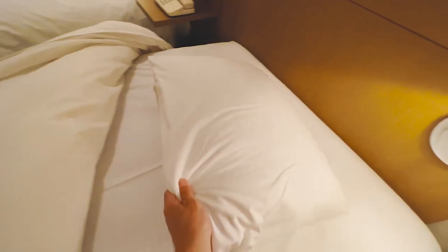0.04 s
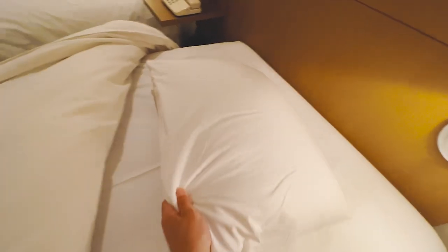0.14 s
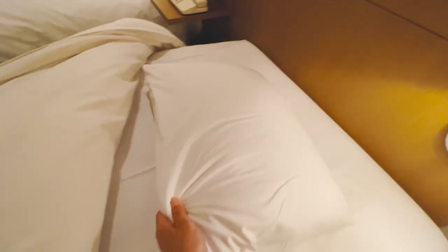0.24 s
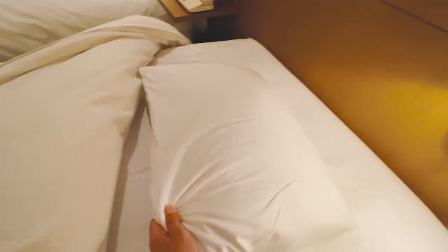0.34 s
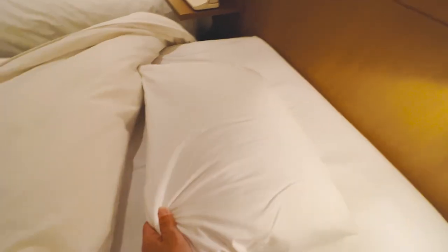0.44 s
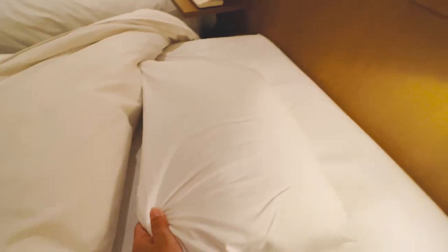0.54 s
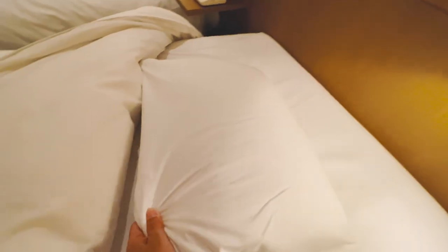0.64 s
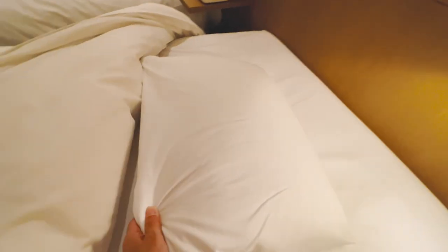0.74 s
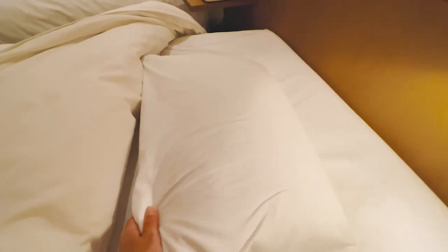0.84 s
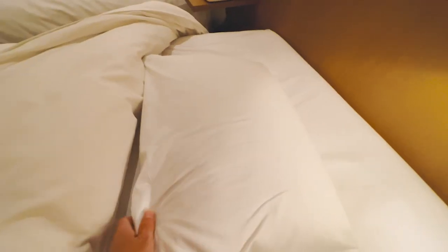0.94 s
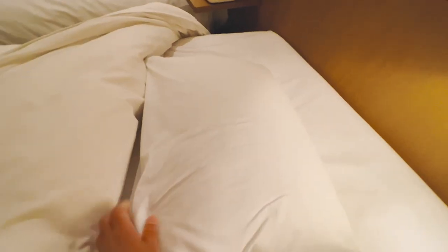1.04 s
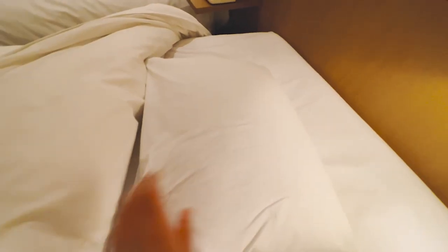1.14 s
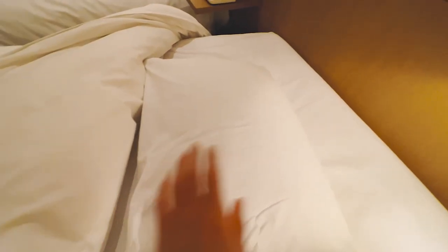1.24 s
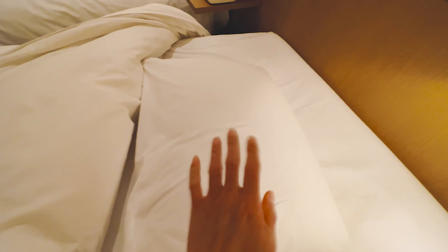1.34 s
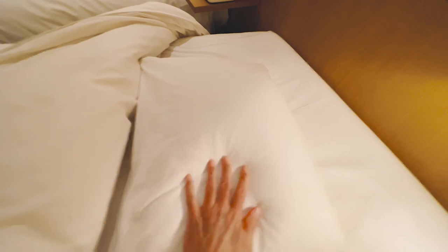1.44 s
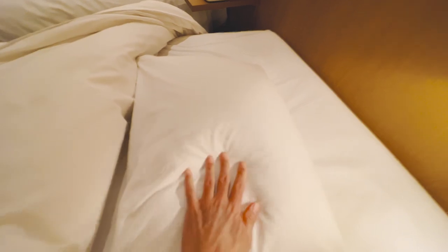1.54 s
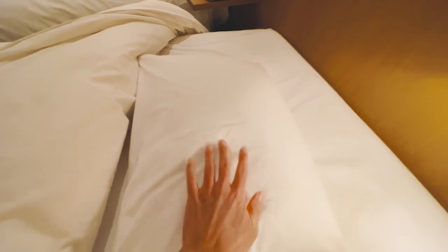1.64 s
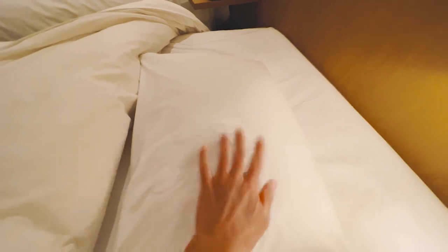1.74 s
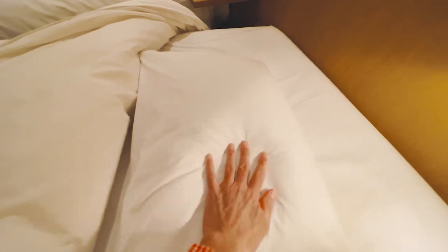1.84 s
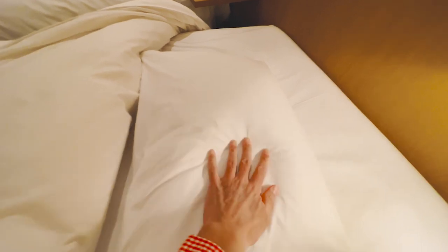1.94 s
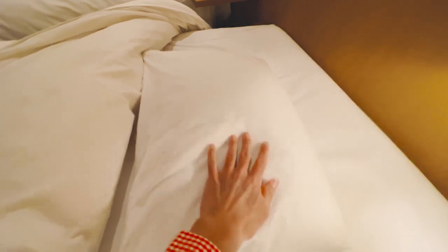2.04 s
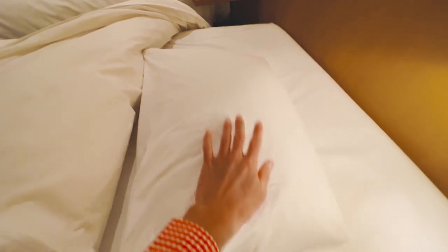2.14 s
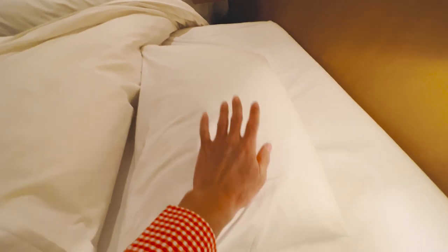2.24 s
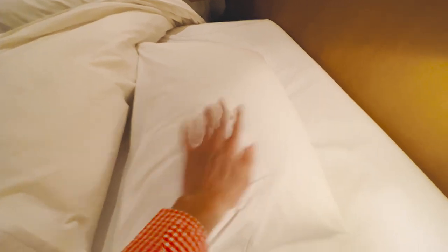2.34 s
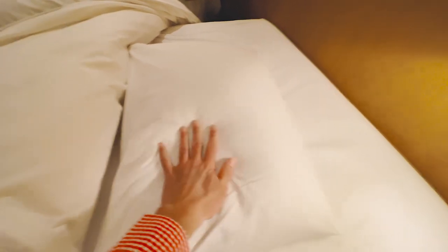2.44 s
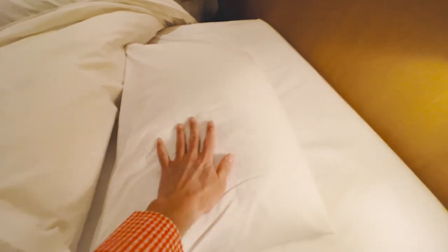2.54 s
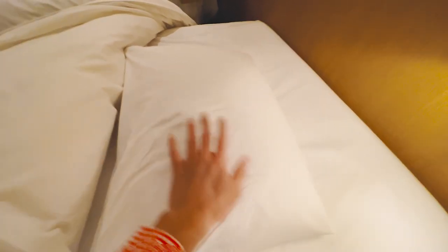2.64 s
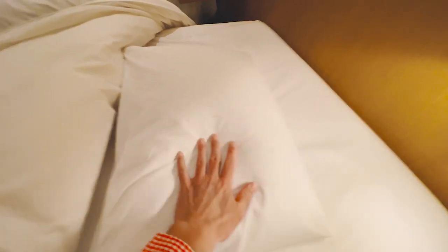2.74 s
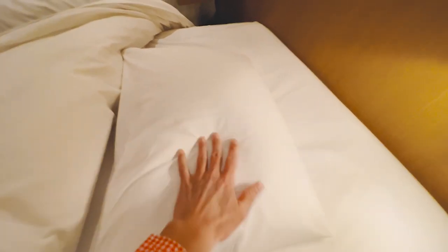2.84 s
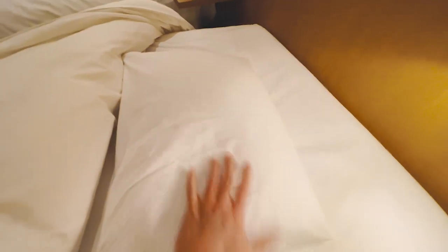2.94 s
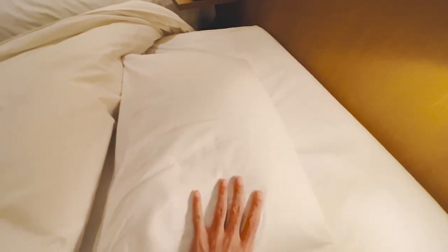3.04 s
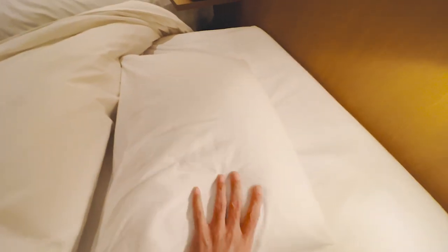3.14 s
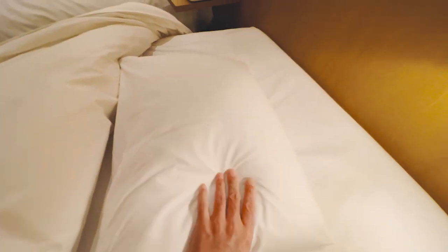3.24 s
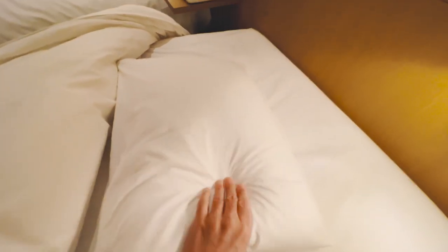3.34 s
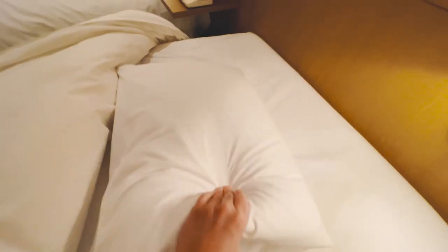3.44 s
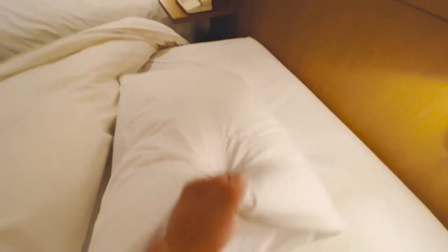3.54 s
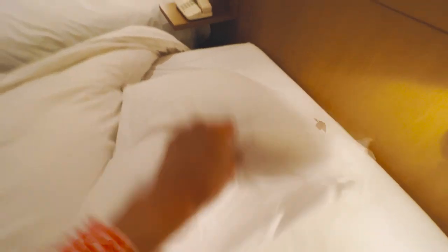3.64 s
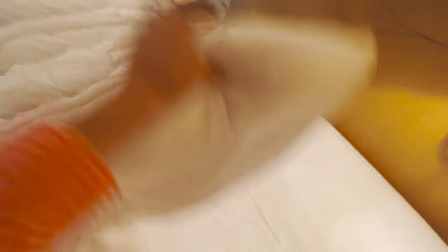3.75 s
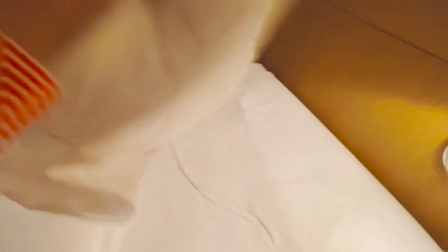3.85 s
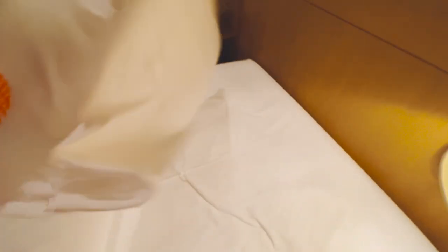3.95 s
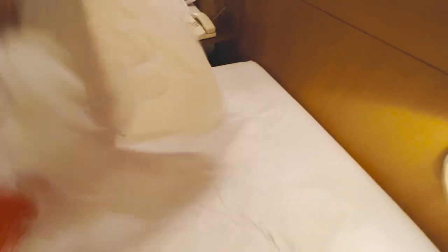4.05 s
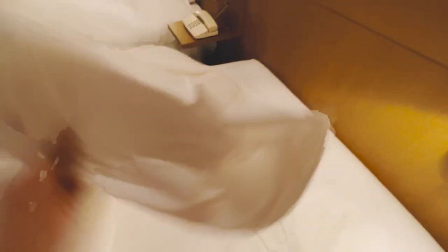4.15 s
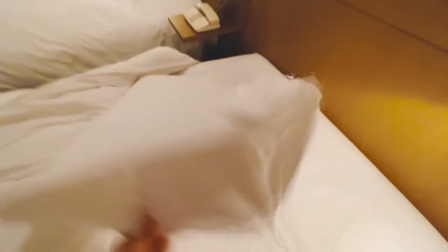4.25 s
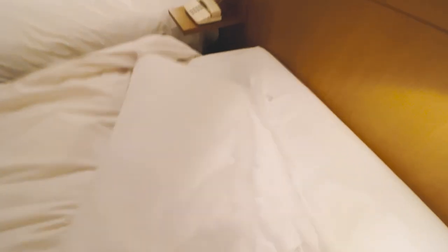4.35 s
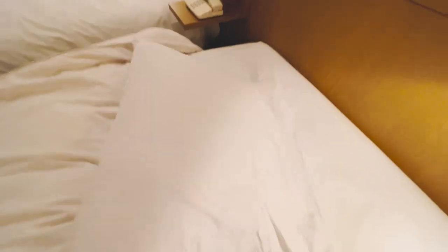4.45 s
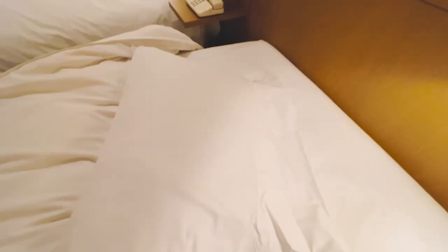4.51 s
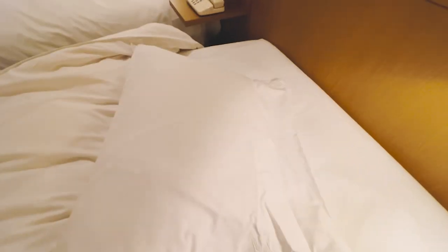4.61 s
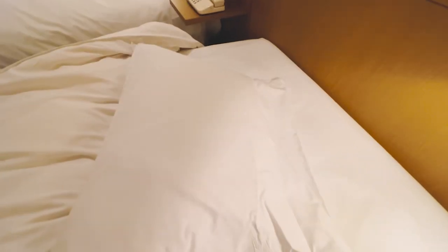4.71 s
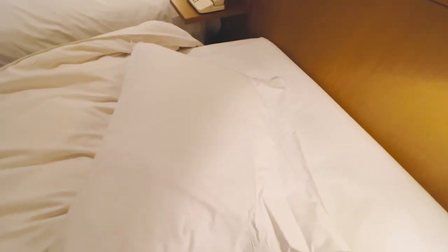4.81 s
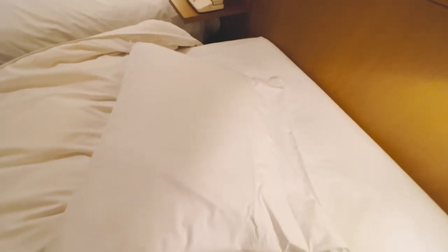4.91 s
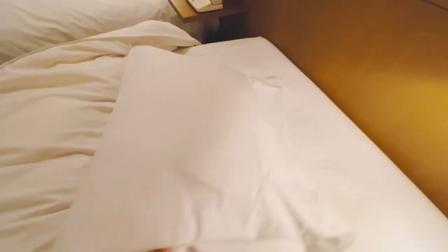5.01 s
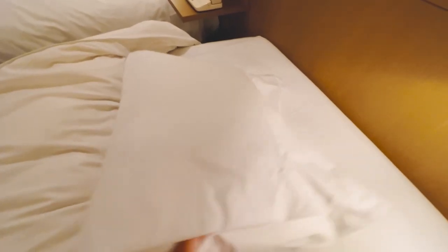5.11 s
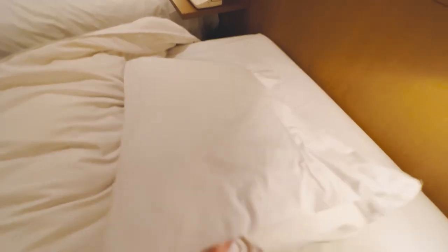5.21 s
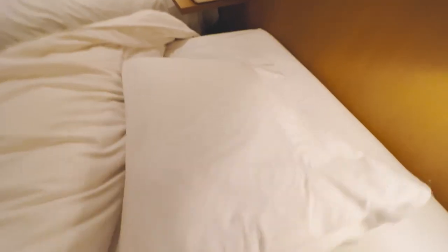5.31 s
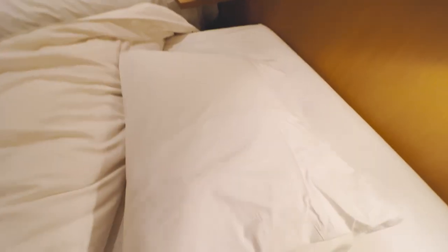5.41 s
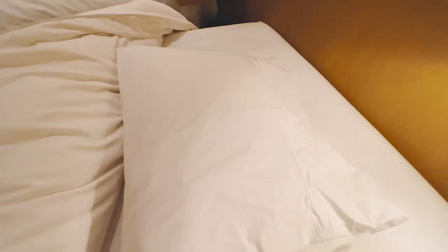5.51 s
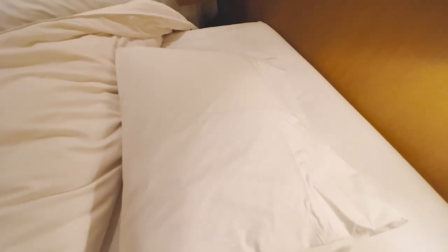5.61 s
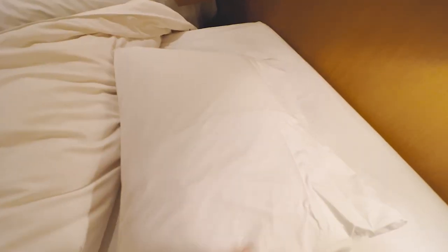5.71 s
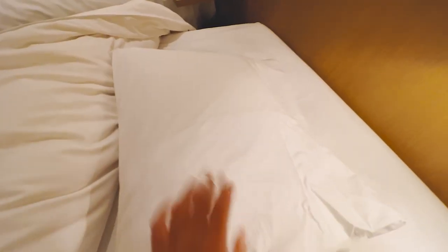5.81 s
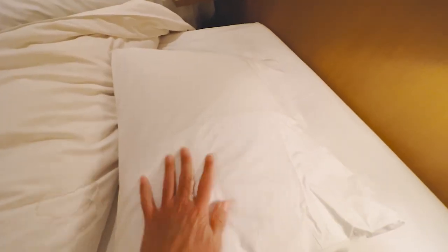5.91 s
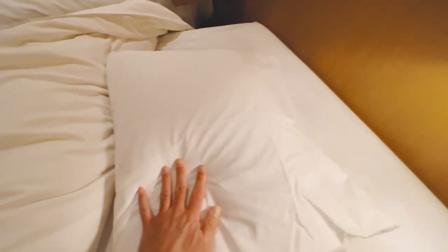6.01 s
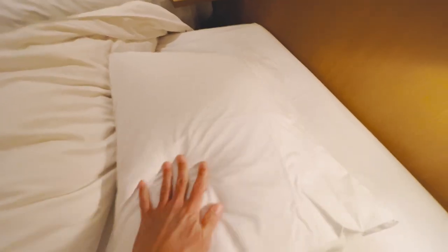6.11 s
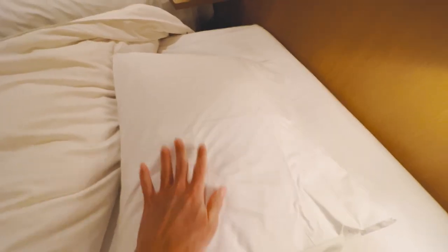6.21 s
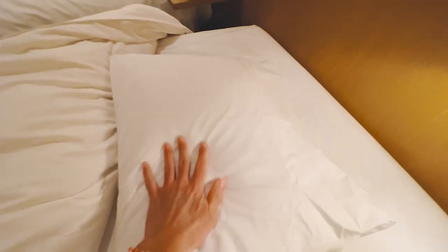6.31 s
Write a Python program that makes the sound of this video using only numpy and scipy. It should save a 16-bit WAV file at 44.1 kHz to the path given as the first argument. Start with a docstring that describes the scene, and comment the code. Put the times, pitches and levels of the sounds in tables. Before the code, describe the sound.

Cotton slides, a palm claps a plump pillow four times, fabric whooshes and rustles as it is turned, then two muffled pats follow.

```python
"""In a small, quiet room, a hand slides a pillow over a bed, pats it four times, flips it, drags it straight
and pats it twice more. Each pat claps out a pocket of air (a sagging tone) and pushes the filling (a falling
thump with booming room modes). Cotton rustles in between, as coloured noise that follows each movement, creases
snap and the pillowcase flaps with short ticks, the flapping pillow shoves the air, and low-pass noise makes a
ventilation rumble."""
import sys
import numpy as np
from scipy import signal
from scipy.fft import rfft, irfft, next_fast_len
from scipy.io import wavfile
from scipy.ndimage import map_coordinates

SR = 44100
rng = np.random.default_rng(int(sys.argv[2]) if len(sys.argv) > 2 else 0)


def store_wav(level_fs):
    """Save 16-bit WAV to argv[1]."""
    pcm = np.round(np.clip(np.atleast_2d(level_fs), -1, 1) * 32767)
    wavfile.write(sys.argv[1], SR, pcm.T.astype(np.int16))


N = 280917

# friction spectrum of a low rub, for cloth and fingers: frequency_hz, density_db (relative, per Hz)
RUB_SPECTRUM = [(250, -30.5), (500, -1), (700, 1), (1200, -5.5), (1700, -7.5), (2400, -17.5), (5000, -32)]
BASS_WET_DB = -9  # room share of low sounds: the bedding soaks up bass


def amp(db):
    """Level law: decibels to an amplitude ratio."""
    return 10 ** (np.asarray(db) / 20)


def unit(x):
    """Power normalization: scale to rms 1."""
    return x / np.sqrt(np.mean(x ** 2) + 1e-20)


def along(points, hz):
    """Logarithmic frequency scale: interpolate (frequency_hz, value) points along it."""
    f, v = np.transpose(points)
    return np.interp(np.log(hz + 1), np.log(f + 1), v)


def wobble(rate):
    """Slow random modulation: a smooth curve through rate random knots a second."""
    knots = rng.standard_normal(int(N * rate / SR) + 4)
    return map_coordinates(knots, [np.arange(N) * rate / SR])


def filtered(x, response):
    """Linear filtering: multiply the spectrum by a response of frequency."""
    n = x.shape[-1]
    m = next_fast_len(n + 8192)  # zero padding leaves room for the filter to ring
    return irfft(rfft(x, m) * response(np.fft.rfftfreq(m, 1 / SR)), m)[..., :n]


def widen(pair):
    """Interaural coherence: mix two unrelated signals so left-right correlation depends on frequency."""
    # left-right correlation: frequency_hz, correlation (-1 to 1)
    likeness = [(60, 1), (130, 0.76), (250, 1), (500, 0.23), (1000, 0.13), (1950, -0.29), (2900, -0.22),
                (3800, 0.034), (4900, -0.13), (7000, 0.15), (9500, -0.07), (11000, -0.99), (12800, 0.92),
                (16000, .3)]

    def mid_side_gains(hz):
        angle = np.arccos(np.clip(along(likeness, hz), -1, 1)) / 2
        return np.array([np.cos(angle), np.sin(angle)])

    mid, side = filtered(pair, mid_side_gains)
    return np.array([mid + side, mid - side])


def noise(spectrum, size=N):
    """Spectral shaping: stereo Gaussian noise of rms 1, coloured by a table of levels."""
    white = widen(rng.standard_normal((2, size)))
    return unit(filtered(white, lambda hz: amp(along(spectrum, hz))))


def add(track, s, sound):
    """Superposition: mix a sound into the track at time s."""
    part = track[:, round(s * SR):][:, :sound.shape[-1]]
    part += sound[..., :part.shape[-1]]


def ventilation(level_db=-52.0):
    """Broadband flow noise: a low rumble whose level drifts slightly."""
    # rumble spectrum: frequency_hz, density_db (relative, per Hz)
    vent_spectrum = [(20, -23.5), (40, -8.5), (60, 1.5), (80, -4.5), (115, -4), (160, -11), (210, -20.5),
                     (300, -17.5), (450, -24), (1000, -38), (2000, -33), (4000, -48.5), (9000, -42),
                     (16000, -62.5)]
    drift_db = 1.2 * wobble(7)
    return amp(level_db + drift_db) * noise(vent_spectrum)


def glide(start, length, release):
    """Kinematics of one stroke: speed 0-1 eases in (long ones more slowly), holds, and dies away."""
    t = np.arange(N) / SR - start
    attack = 0.038 + 0.3 * length
    ease_in = np.sin(np.pi / 2 * np.clip(t / attack, 0, 1)) ** 2
    return ease_in * np.exp(-np.maximum(t - length, 0) / release)


def swell(s, half):
    """Gaussian pulse: a rise and fall around time s, 0-1."""
    return np.exp(-((np.arange(N) / SR - s) / half) ** 2)


def friction():
    """Incoherent power addition: combine all moving cloth into gains of rub, scrape and hiss."""
    # pillow over sheet: start_s, length_s, scrape_db, rub_db and hiss_db (both relative to scrape)
    slides = [(-.3, 0.922, -60.5, 7, -5), (0.569, .48, -65, -1, -5), (3.925, .47, -52, -1, -6),
              (3.994, 0.089, -47, -15, -7.5), (4.164, .09, -50, 2.5, -2.5), (4.336, 0.074, -52, 5, -11),
              (4.424, 0.18, -63.5, -3, -7), (4.623, 0.22, -58.5, 1, -6.5), (4.856, .47, -52.5, -0.5, -13.5),
              (5.261, 0.24, -52, -4, -11)]
    # hand strokes or grips the pillowcase: start_s, length_s, scrape_db, brightness_db
    strokes = [(0.881, .14, -63, 3.5), (2.967, 0.078, -58.5, 4.5), (3.102, 0.11, -51.5, 1),
               (3.206, 0.31, -55, 0), (3.353, 0.093, -54, -0.5), (3.488, 0.5, -59, 1),
               (3.673, .07, -57, 6.5), (3.748, 0.109, -59.5, -4), (5.44, .07, -62.5, 5.5),
               (5.565, .2, -64.5, 1), (5.937, 0.074, -58.5, -1.5)]
    # filling swells back as the hand lifts off: peak_s, scrape_db, half_length_s
    lifts = [(1.609, -61, 0.067), (2.0, -66.5, 0.13), (2.581, -64.5, 0.06), (2.898, -64.5, 0.066),
             (6.172, -62.5, 0.063)]
    # the arm never quite rests: time_s, scrape_db
    sleeve = [(0, -70), (1.25, -77), (1.7, -72.5), (2.33, -80.5), (3.0, -68.5), (4.9, -68.5), (5.85, -72.5),
              (6.3, -72)]
    slide_release_s, stroke_release_s = 0.045, 0.049
    hand_rub_db, hand_hiss_db = 0.5, -4  # relative to scrape, before brightness
    lift_bright_db, sleeve_bright_db = 1.5, -1  # brighter means more hiss and less rub

    def touch(db, bright_db):
        return amp(db + np.array([hand_rub_db - bright_db, 0, hand_hiss_db + bright_db]))

    moves = []
    for s, length, db, rub_db, hiss_db in slides:
        moves.append((amp(db + np.array([rub_db, 0, hiss_db])), glide(s, length, slide_release_s)))
    for s, length, db, bright_db in strokes:
        moves.append((touch(db, bright_db), glide(s, length, stroke_release_s)))
    for s, db, half in lifts:
        moves.append((touch(db, lift_bright_db), swell(s, half)))
    sleeve_db = np.interp(np.arange(N) / SR, *np.transpose(sleeve))
    moves.append((touch(0, sleeve_bright_db), amp(sleeve_db)))
    gains, speeds = zip(*moves)
    return np.sqrt(np.square(gains).T @ np.square(speeds))


def off_the_sheet(x, share=0.39, delay=0.000696, sway=.3):
    """Comb interference: a bounce off the bed colours the rustle, and its path length drifts at random."""
    path = SR * delay * np.exp(sway * wobble(5))  # in samples
    bounce = []
    for side, reach in zip(x, (1, 1.15)):  # the right path is longer
        bounce.append(map_coordinates(side, [np.arange(N) - path * reach]))
    return (x + share * np.array(bounce)) / np.hypot(1, share)


def cloth(grain_db=1.13, catch_db=0.5):
    """Stick-slip friction: threads catch and let go as cotton slides, and the moving pillow swishes."""
    # pillow pushes air: fastest_s, level_db, half_length_s
    swings = [(.25, -59, 0.31), (3.827, -47, 0.051), (4.08, -48, 0.039), (4.233, -45.5, 0.059),
              (4.384, -53.5, 0.08), (5.154, -60.5, 0.23)]
    # spectra of pushed air, mid scrape and fibre hiss: frequency_hz, density_db (relative, per Hz)
    swish_spectrum = [(25, -6.5), (55, 6), (130, 3.5), (220, -2.5), (320, 4), (550, -8), (800, -15.5),
                      (2000, -47)]
    scrape_spectrum = [(1100, -21.5), (2000, 1.5), (2900, 3), (4000, -1.5), (5200, -2), (7000, -7.5),
                       (9500, -10.5), (13000, -26.5)]
    hiss_spectrum = [(3500, -23.5), (6000, -0.5), (8000, 0.5), (9700, 4), (10800, -1), (12500, 1.5),
                     (14000, -6.5), (16000, -9.5)]
    catch = catch_db * wobble(35)
    threads = unit(amp(grain_db * wobble(900)))
    air = amp(-65.5)  # steady air stirred by the arm
    for s, db, half in swings:
        air = air + amp(db) * swell(s, half)
    swish = air * amp(catch) * noise(swish_spectrum)
    rub_gain, scrape_gain, hiss_gain = friction()
    rub = rub_gain * amp(catch) * noise(RUB_SPECTRUM)
    scrape = scrape_gain * amp(catch) * noise(scrape_spectrum)
    hiss = hiss_gain * amp(0.45 * catch) * noise(hiss_spectrum)
    return swish + off_the_sheet(threads * (rub + scrape + hiss))


def from_left(sound, pan_db, lead=.0001):
    """Interaural time and level differences: left leads by lead seconds and differs by pan_db."""
    sides = np.array([[.5], [-.5]])
    return filtered(sound, lambda hz: amp(pan_db * sides) * np.exp(2j * np.pi * hz * lead * sides))


def room(x, wet_db, gap=.004, early_db=0, early_life=0.033):
    """Reverberation by convolution: a dense early cluster, then a tail with frequency-dependent decay."""
    # reverberation time: frequency_hz, t60_s
    decay_times = [(100, 0.36), (350, 0.3), (1000, 0.44), (2500, 0.5), (6400, 0.27), (15000, 0.35)]
    # colour of the reflections: frequency_hz, gain_db
    wall_colour = [(40, -17.5), (170, -1.5), (290, 7), (500, -4), (800, -7), (1300, 0), (3000, -11),
                   (6000, -6.5), (15000, -9.5)]
    hz, t, z = signal.stft(widen(rng.standard_normal((2, SR // 2))), SR, nperseg=256)
    decay = amp(-60 * t / along(decay_times, hz)[:, None])
    early = 1 + amp(early_db) * np.exp(-t / early_life)
    tail = signal.istft(z * decay * early, SR, nperseg=256)[1]
    tail = filtered(tail / np.linalg.norm(tail[0]), lambda f: amp(along(wall_colour, f)))
    tail = np.pad(tail, ((0, 0), (round(gap * SR), 0)))  # reflections follow after the gap
    return x + amp(wet_db) * signal.fftconvolve(x, tail, axes=1)[:, :x.shape[-1]]


def crack(spectrum, t, t60, grit_db):
    """Impulsive excitation: one sharp contact and a decaying spray of tiny ones; coloured, peak 1."""
    spray = amp(grit_db - 60 * np.abs(t) / t60) * (t >= 0) * rng.standard_normal(len(t))
    snap = filtered((t == 0) + spray, lambda hz: amp(along(spectrum, hz)))
    return snap / np.max(np.abs(snap))


def creases_and_flaps():
    """Buckling instability: a fold of cotton snaps, or the pillowcase flaps, with a short, broad tick."""
    # snapping folds, and the pillowcase flapping at 4.068, 4.21 and 4.395 s: time_s, level_db, centre_hz, t60_s
    knocks = [(.638, -43, 6080, 0.04), (1.2646, -46.5, 845, 0.021), (3.499, -34, 2210, 0.0264),
              (3.716, -42, 8050, 0.075), (3.744, -40.5, 1090, 0.015), (4.068, -35, 386, 0.031),
              (4.21, -39, 694, 0.084), (4.395, -40, 750, 0.069), (4.898, -42, 5000, 0.0098),
              (5.032, -30, 4800, 0.013), (5.338, -39, 520, 0.04), (5.6, -42, 1250, 0.024),
              (5.622, -52, 4000, 0.016), (5.6503, -38, 3500, 0.011), (6.0108, -32, 4810, 0.011)]
    out = np.zeros((2, N))
    t = np.arange(-SR // 50, SR // 3) / SR
    for s, db, hz, t60 in knocks:
        # gain in dB against frequency: flat just below the centre, falling away on both sides
        colour = [(hz / 5, -22), (hz / 1.7, 0), (hz, 0), (hz * 3, -14), (hz * 9, -40)]
        tick = amp(db) * crack(colour, t, t60, grit_db=-9)
        add(out, s + t[0], room(from_left(tick, pan_db=0, lead=.00005), wet_db=-5))
    return out


def thump(t, start_hz=345, end_hz=60.7, sink=0.00583, push=0.021, ring_db=-8, ring_t60=0.41):
    """Modal excitation: the sinking palm's pitch falls into the deepest room mode; higher modes build up."""
    # low room modes: frequency_hz, level_db (before random spread), t60_s
    boom_modes = [(131.6, -13, 0.19), (242.5, -28, 0.27), (278.6, -23, 0.2), (356.5, -34.5, 0.27)]
    cycles = end_hz * t + (start_hz - end_hz) * sink * (1 - np.exp(-t / sink))
    size = 0.47 * np.exp(-(t / push) ** 6) + amp(ring_db - 60 * t / ring_t60)
    body = size * (1 - np.exp(-t / 0.00098)) * np.sin(2 * np.pi * cycles)
    late = np.maximum(t - .012, 0)  # the higher modes start 12 ms later
    modes = np.zeros(len(t))
    for hz, db, t60 in boom_modes:
        mode_db = db + rng.normal(0, 1) - 60 * late / t60
        modes += amp(mode_db) * np.sin(2 * np.pi * hz * late)
    return body + modes * (1 - np.exp(-late / 0.028))


def pats(clap_life=0.0025, clap_sag=0.0052, slap_t60=0.01, fingers_db=-15, puff_t60=0.3):
    """Air-cavity compression: fingers brush, the palm shuts an air pocket, and air hisses through the weave."""
    # palm on pillow: time_s, thump_db, clap_db, pocket_hz (at contact), slap_db,
    # brush_s (decay each side of its peak), puff_db, left_minus_right_db
    palm_blows = [(1.4424, -8.5, -12, 1073, -3.5, 0.0022, -37.5, -0.5),
                  (1.813, -20, -11.5, 843, -20, 0.0036, -44, 1.5),
                  (2.4038, -12.5, -19.5, 1050, -17.5, 0.0019, -38, 1.5),
                  (2.7286, -13, -9.5, 1092, -14.5, 0.0018, -42, 0),
                  (5.9426, -27.5, -31.5, 646, -39.5, 0.0019, -48, 6),
                  (6.3258, -22.5, -29.5, 835, -38.5, 0.0041, -47.5, 5)]
    # skin slap colour: frequency_hz, gain_db
    slap_colour = [(100, -26.5), (450, -10.5), (800, 6.5), (1500, -2), (1950, 5.5), (2400, -0.5),
                   (2850, 8.5), (3300, -2), (4200, -1), (5500, -8), (8000, -22.5), (12500, -26),
                   (16000, -28)]
    # air through the weave: frequency_hz, density_db (relative, per Hz)
    puff_spectrum = [(200, -26), (1000, 2.5), (3000, -4.5), (6000, -11), (10000, -13), (13000, -17.5),
                     (16000, -18.5)]
    lead_in_s = .0012  # the finger brush peaks this long before the palm lands
    out = np.zeros((2, N))
    time = np.arange(-SR // 50, SR * 3 // 5) / SR
    t = np.maximum(time, 0)
    for s, thump_db, clap_db, pocket_hz, slap_db, brush, puff_db, pan_db in palm_blows:
        # the pocket's pitch sags as the filling gives way
        cycles = pocket_hz * clap_sag * (1 - np.exp(-t / clap_sag))
        clap = -np.sin(2 * np.pi * cycles) * amp(clap_db) * np.exp(-(t / clap_life) ** 2)
        slap = amp(slap_db) * crack(slap_colour, time, slap_t60, grit_db=-8.5)
        brushing = np.exp(-np.abs(time + lead_in_s) / brush)
        fingers = amp(clap_db + fingers_db) * brushing * noise(RUB_SPECTRUM, size=len(t))[0]
        leak = amp(puff_db - 60 * t / puff_t60) * (1 - np.exp(-t / .002))
        puff = leak * noise(puff_spectrum, size=len(t))
        smack = from_left(clap + slap + fingers, pan_db)
        low = from_left(amp(thump_db) * thump(t), pan_db=1.5)
        add(out, s + time[0], room(smack, wet_db=-5.5, early_db=2) + room(low, BASS_WET_DB) + puff)
    return out


def flops():
    """Volume displacement: the loose pillow shoves the air in a brief low oscillation."""
    # pillow flaps and lands as it is turned: time_s, level_db, frequency_hz, half_length_s
    shoves = [(3.957, -35, 102, 0.0074), (4.303, -34.5, 126, 0.0046), (4.402, -31.5, 168, 0.0022),
              (4.417, -28, 97, 0.0055), (4.447, -33.5, 94, 0.0051)]
    out = np.zeros((2, N))
    t = np.arange(-SR // 20, SR // 3) / SR
    for s, db, hz, half in shoves:
        shove = amp(db) * np.exp(-(t / half) ** 2) * np.cos(2 * np.pi * hz * t)
        add(out, s + t[0], room(from_left(shove, pan_db=3.5), BASS_WET_DB))
    return out


def scene():
    """Superposition of sources: everything happens within arm's reach of the microphone."""
    return ventilation() + cloth() + creases_and_flaps() + pats() + flops()


def record(dry, low_cut_hz=30, top_hz=15850):
    """Transducer response: each port has its own colour; both share dips, a low cut and a hard band limit."""
    # narrow dips: centre_hz, width_hz, depth (0-1)
    port_dips = [(5330, 140, 1), (7690, 440, 0.9)]
    # level difference of the ports: frequency_hz, left_minus_right_db
    port_tilt = [(150, -2.5), (700, 2), (1800, 1.5), (2850, -4.5), (4400, 5.5), (6000, 6.5), (8300, 6.5),
                 (9800, -3.5), (11200, 0)]

    def response(hz):
        ports = amp(along(port_tilt, hz) * np.array([[.5], [-.5]]))
        dips = np.ones(len(hz))
        for f, width, depth in port_dips:
            dips *= 1 - depth * np.exp(-((hz - f) / (width / 2)) ** 2)
        low_cut = hz ** 2 / np.hypot(hz ** 2, low_cut_hz ** 2)
        return ports * dips * low_cut * (hz < top_hz)

    return filtered(dry, response)


dry = scene()
out = record(dry)
store_wav(out)
```